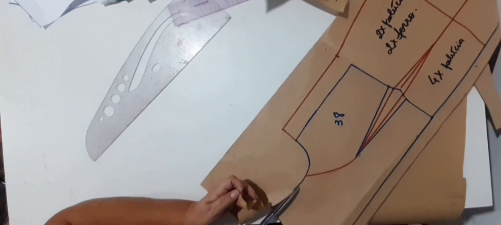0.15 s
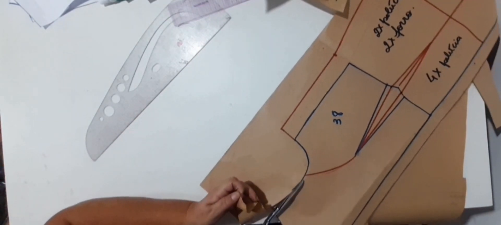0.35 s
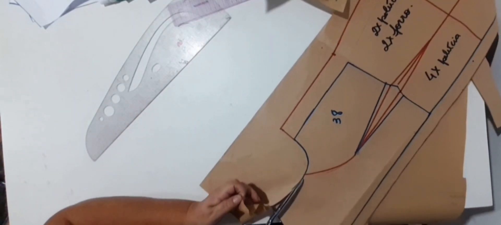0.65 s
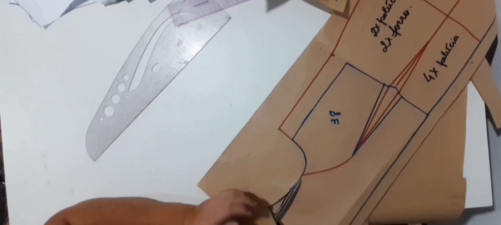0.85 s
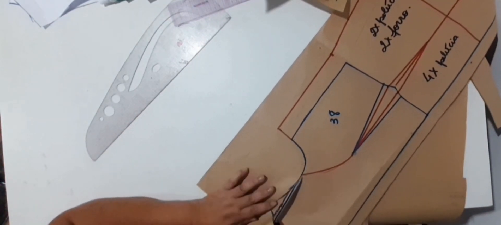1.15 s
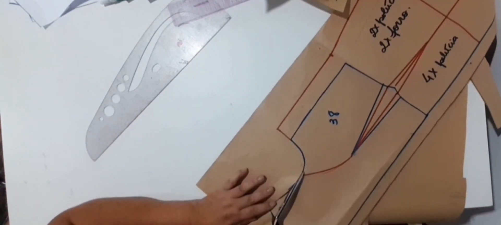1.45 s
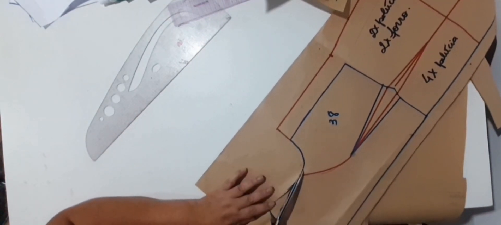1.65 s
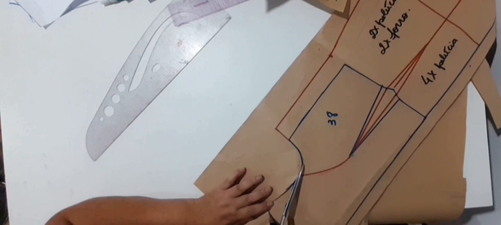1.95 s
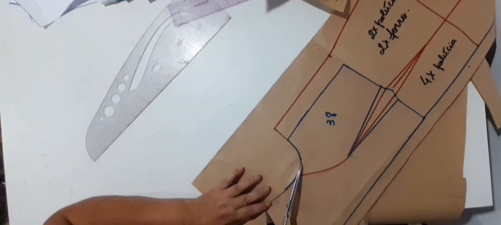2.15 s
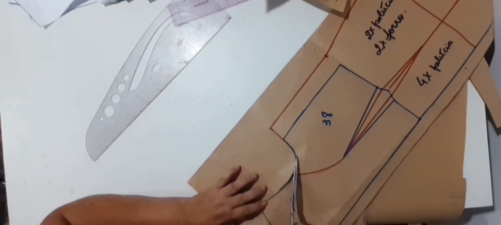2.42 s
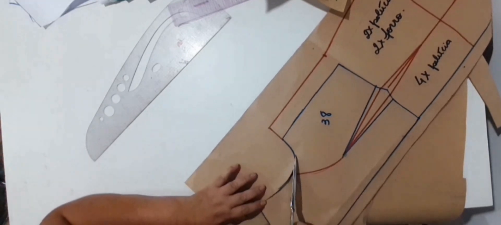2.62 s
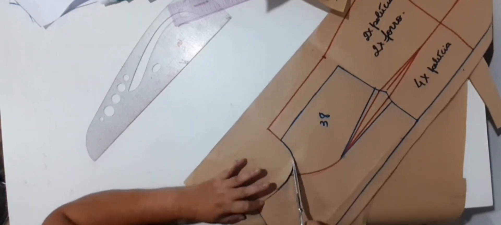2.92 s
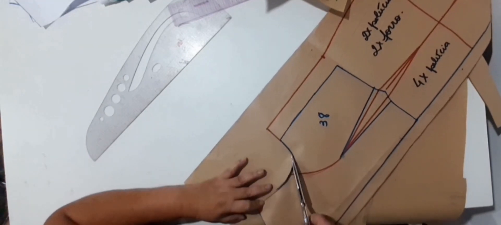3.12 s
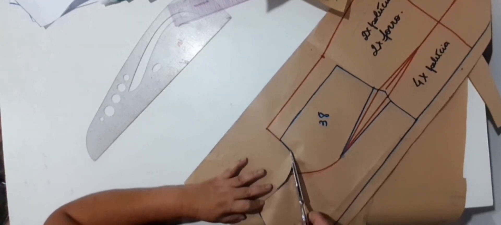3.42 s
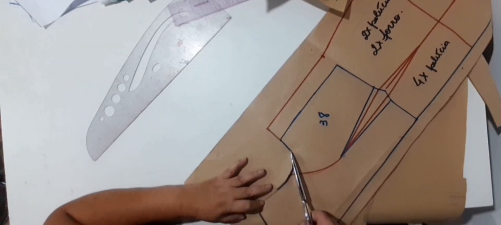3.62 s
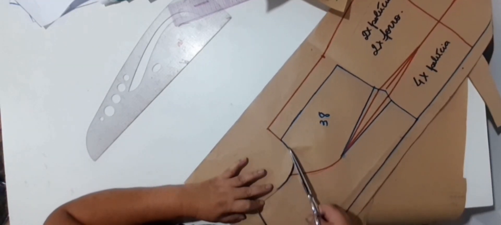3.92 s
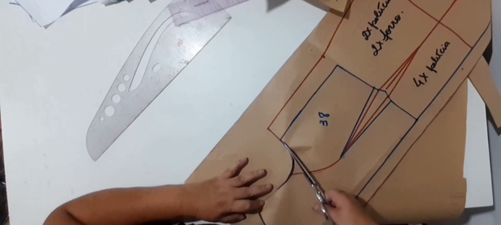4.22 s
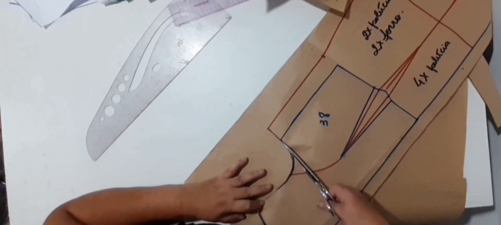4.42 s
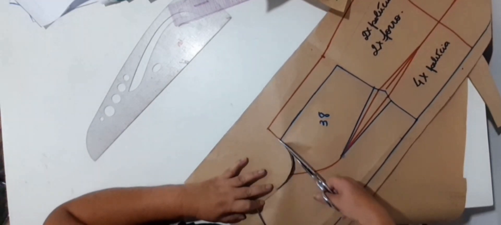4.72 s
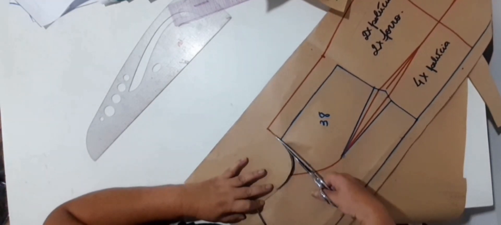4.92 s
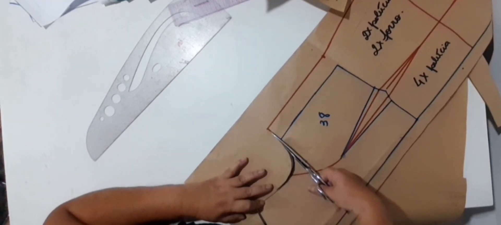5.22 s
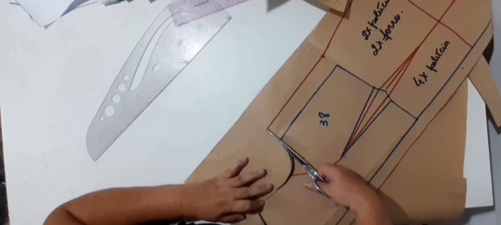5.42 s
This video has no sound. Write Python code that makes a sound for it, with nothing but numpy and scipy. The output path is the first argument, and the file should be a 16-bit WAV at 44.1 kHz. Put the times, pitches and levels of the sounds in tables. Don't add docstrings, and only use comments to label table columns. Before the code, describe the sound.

A scissor crunch starts almost at once, then fingers brush the sheet and a hand lands dully on the table. Clustered snips follow, strongest around the middle, then more spaced cuts to the end. Scraping blades, paper snaps and low table hum fill the gaps. Near stereo pickup, small quiet room, faint background air.

```python
import sys
import numpy as np
from scipy import signal
from scipy.fft import rfft, irfft, next_fast_len
from scipy.io import wavfile
from scipy.ndimage import uniform_filter1d

SR = 44100
rng = np.random.default_rng(int(sys.argv[2]) if len(sys.argv) > 2 else 0)


def wrap_up_sound(samples):
    columns = np.atleast_2d(samples).T
    tamed = np.clip(columns, -1, 1)
    steps = np.round(tamed * 32767).astype(np.int16)
    wavfile.write(sys.argv[1], SR, steps)


def ratio(d):
    e = np.asarray(d, float) / 20
    return 10 ** e


N = 245005


def evened(x):
    return x / np.sqrt(np.mean(x ** 2) + 1e-20)


def read(points, hz):
    f, value = np.transpose(points)
    return np.interp(np.log(hz + 1), np.log(f + 1), value)


def curves(rows):
    times, *columns = np.transpose(rows)
    return [np.interp(np.arange(N) / SR, times, column) for column in columns]


def body(colour, modes, lo_hz, hi_hz):
    hz = abs(np.fft.fftfreq(8192, 1 / SR)) + 1
    peaks = 1 + sum(ratio(2 * db) / (1 + (2 * (hz - f) / w) ** 2) for f, w, db in modes)
    band = 1 / (1 + (lo_hz / hz) ** 12) / (1 + (hz / hi_hz) ** 12)
    log_gain = np.log(ratio(read(colour, hz)) * np.sqrt(peaks * band) + 1e-6)
    taps = np.fft.ifft(np.exp(np.conj(signal.hilbert(log_gain)))).real[:6000]
    return taps / np.linalg.norm(taps)


def fibres(per_s, spread_db, clump_db, clump_s, smooth):
    sizes = ratio(spread_db * np.minimum(rng.exponential(1, N), 5)) * rng.choice([-1., 1.], N)
    ticks = evened(sizes * (rng.random(N) < per_s / SR))
    span = int(clump_s * SR)
    clumps = evened(uniform_filter1d(uniform_filter1d(rng.standard_normal(N), span), span))
    rubbed = ticks + smooth * rng.standard_normal(N)
    return evened(rubbed * ratio(clump_db * np.clip(clumps, -2.5, 2.5)))


def rub(drives, gains, colour, modes, bands_hz):
    out = np.zeros(N)
    for drive, gain, band in zip(drives, gains, bands_hz):
        out += signal.oaconvolve(drive * gain, body(colour, modes, *band))[:N]
    return out


def resonate(x, hz, width_hz):
    turn = np.exp(2j * np.pi * np.cumsum(hz * np.ones(N)) / SR)
    keep = np.exp(-np.pi * width_hz / SR)
    return 2 * (turn * signal.lfilter([1 - keep], [1, -keep], x / turn)).real


def bending(x, patchy_db, size=256):
    hz, _, z = signal.stft(x, SR, nperseg=size, noverlap=size * 3 // 4)
    patches = rng.standard_normal(z.shape[::-1]).T
    patches = uniform_filter1d(patches, size=3, axis=0)
    patches = evened(uniform_filter1d(patches, size=8192 // size, axis=1))
    depth_db = patchy_db * np.clip(hz / 2500, 0, 1)[:, None]
    mean_db = np.log(10) / 20 * depth_db ** 2
    return signal.istft(z * ratio(depth_db * patches - mean_db), nperseg=size, noverlap=size * 3 // 4)[1][:N]


# f/Hz, level/dB per Hz
AIR_COLOUR = [(18, -57), (30, -3), (519, -7.5), (1180, -22), (1530, -19), (3500, -19), (5890, -28),
              (7470, -19.5), (13700, -30), (16500, -33)]


def room_air():
    air = signal.oaconvolve(rng.standard_normal(N), body(AIR_COLOUR, [], 27, 14000))[:N]
    return bending(ratio(-73) * air, patchy_db=2.2)


# peak t/s, rise/s, fall/s, scrape level/dB, fizz re scrape/dB
SLIDES = [(.05, 0.18, 0.23, -51.5, -7), (.26, 0.75, 0.36, -51, -5.5), (.72, 0.26, 0.34, -58.5, -1.5),
          (.82, 0.48, 0.094, -63, -0.5), (1.05, 0.073, 0.15, -51, 0), (1.19, 0.58, 0.54, -58.5, 0),
          (1.35, 0.15, 0.16, -62.5, -5), (1.64, 0.033, 0.076, -80, -4), (1.74, 0.35, 0.33, -57.5, -2.5),
          (1.869, 0.13, 0.12, -50, 0.5), (2.15, 0.53, 0.71, -59.5, 4.5), (2.302, 0.12, 0.27, -54.5, 10.5),
          (2.368, 0.27, 0.1, -41.5, -2), (2.999, 0.28, 0.44, -58.5, 1), (3.085, 0.092, 0.042, -54.5, -46),
          (3.14, 0.075, 0.2, -58, -25), (3.27, 0.11, 0.096, -65.5, -10), (3.33, 0.044, 0.053, -83, 11),
          (3.83, 0.11, 0.038, -58, 4), (3.98, 0.46, 0.11, -54.5, 3), (4.06, 0.33, 0.1, -57.5, 0.5),
          (4.57, 0.11, 0.24, -61.5, 6), (4.698, 0.22, 0.2, -49, 1), (4.77, 0.15, 0.11, -54, -7),
          (5.1, .05, 0.22, -60.5, -1.5), (5.17, 0.19, 0.15, -58.5, 0.5), (5.235, 0.26, 0.16, -54, 0),
          (5.291, 0.2, 0.042, -51.5, -4.5), (.22, 0.088, .12, -56, -12), (1.68, 0.071, 0.19, -72, -7),
          (2.42, 0.054, 0.1, -53.5, -4), (3.21, 0.12, 0.13, -80, -20), (4.74, 0.1, 0.069, -49.5, 4),
          (1.94, .08, 0.089, -61, -5), (3.64, .05, 0.053, -67, 1), (4.6, 0.082, .1, -61.5, 6),
          (3.485, .04, .04, -61, -3)]


def swells():
    peak, rise, fall, scrape_db, fizz_db = np.transpose(SLIDES)[:, :, None]
    t = np.arange(0, N + 32, 32) / SR - peak
    loss_db = -37 * np.maximum(-t / rise, t / fall) ** 1.2
    drone_db = -1.5 + 0.53 * fizz_db + 0.79 * loss_db
    sheet_share, usual_db = 0.71, -57.5
    sheet_db = -8 + sheet_share * loss_db + (1 - sheet_share) * (usual_db - scrape_db)
    parts = [loss_db, drone_db, fizz_db + loss_db, sheet_db]
    return [np.repeat(np.sqrt((ratio(scrape_db + part) ** 2).sum(0)), 32)[:N] for part in parts]


# f/Hz, level/dB per Hz
SLIDE_COLOUR = [(88, -43), (150, -9), (245, -2.5), (293, -11.5), (409, -5), (606, -12), (2600, -10.5),
                (6050, -10.5), (13800, -3.5), (15600, -7), (16500, -36)]
# f/Hz, width/Hz, level above the colour/dB
SLIDE_MODES = [(202, 110, 0.5), (333.7, 16, 11.5), (415, 45, 9), (489, 8.2, 11), (4340, 2600, -0.5),
               (6980, 240, 7), (7640, 730, 8.5), (12800, 830, -28)]
# t/s, f/Hz, flap share, share of the flap's upper ring near 4.6 kHz
FLAP = [(0.0, 2830, 0.69, 0.18), (.17, 3730, 0.81, 0.2), (.3, 2340, 1.7, 0.1), (.7, 3130, 0.38, 0.2),
        (0.942, 2230, 0.46, 0.23), (1.05, 3680, 0.53, 0.24), (1.25, 3650, 2.5, 1.2), (1.7, 3650, 1.9, 0.67),
        (1.9, 2540, 0.93, 0.61), (2.35, 2600, 1.83, 0.87), (2.98, 2770, 1.8, 0.4), (3.1, 2480, 2.9, 1.1),
        (3.28, 1910, 2.4, 1.8), (3.85, 3350, 0.3, 0.35), (3.97, 2920, 0.97, 2.3), (4.62, 2760, 2.24, 1.6),
        (5.07, 3030, 0.88, .5), (5.28, 2530, 1.96, 0.28)]


def slide():
    drive = fibres(per_s=5000, spread_db=0.5, clump_db=1.53, clump_s=0.029, smooth=1.75)
    crackles = fibres(per_s=90, spread_db=2.5, clump_db=2.0, clump_s=0.059, smooth=0)
    drive += 0.3 * 0.55 * crackles
    bands_hz = [(1800, 5500), (150, 600), (5500, 16500), (600, 1800)]
    scrape = rub([drive] * 4, swells(), SLIDE_COLOUR, SLIDE_MODES, bands_hz)
    flap_hz, flap, song = curves(FLAP)
    flapping = flap * resonate(scrape, flap_hz, width_hz=650)
    singing = song * resonate(scrape, 4610, width_hz=120)
    return bending(ratio(-4.0) * (scrape + flapping + singing), patchy_db=2.0)


# f/Hz, width/Hz, level/dB
BOARD_MODES = [(56.6, 8.5, -20), (102, 25, 8)]
# t/s, level/dB
THUMPS = [(0.711, -66), (1.033, -40), (1.046, -30.5), (1.063, -54), (1.111, -44), (1.151, -49), (1.24, -52),
          (1.538, -50), (1.858, -50), (2.978, -50), (3.09, -62), (3.29, -68), (0.031, -55), (3.202, -68),
          (4.0, -51.5), (4.31, -52), (4.37, -44), (4.869, -52)]
# f/Hz, level/dB, t60/s
THUMP_MODES = [(57.3, -16.5, 0.64), (102, -2, 0.18), (200, 0.5, 0.068), (241.3, -3.5, 0.1),
               (412, -13, 0.14), (841, -17.5, 0.11), (1570, -13, 0.072)]


def table():
    boards = body([(20, -50), (48, -7.5), (200, -9.5)], BOARD_MODES, 34, 237)
    stir = ratio(-13) * bites()[0] + ratio(-4.5) * swells()[3]
    stir = uniform_filter1d(stir, int(0.11 * SR))
    hum = signal.oaconvolve(rng.standard_normal(N) * stir, boards)[:N]
    t, blows = np.arange(SR // 2) / SR, np.zeros(N)
    ring = sum(ratio(db - 60 * t / t60) * np.sin(2 * np.pi * hz * t) for hz, db, t60 in THUMP_MODES)
    for s, db in THUMPS:
        blows[round(s * SR)] = ratio(db)
    soft_ring = ring * np.minimum(t / 0.0069, 1)
    return ratio(-1.5) * hum + signal.oaconvolve(blows, soft_ring)[:N]


# f/Hz, level/dB per Hz
CUT_COLOUR = [(59, 1), (100, 1.5), (285, -1), (410, 3), (541, -7.5), (1330, -6.5), (1900, -8), (2990, -3),
              (9880, -21), (13000, -14), (15500, -12.5), (16500, -66)]
# f/Hz, width/Hz, level above the colour/dB
SHEET_MODES = [(183, 12, 11.5), (213.4, 28, 16.5), (338, 13, 17.5), (422, 35, 13.5), (476, 2.8, 25),
               (694, 90, 20.5), (890, 61, 20.5), (1350, 82, 20.5), (1615, 63, 13)]
# f/Hz, width/Hz, level above the colour/dB
BLADE_MODES = [(2420, 280, 13.2), (3020, 130, 13.3), (3270, 230, 6.4), (3900, 910, 8.8), (4800, 110, 11),
               (6420, 150, 11.5), (7920, 2570, 14.1), (12080, 1360, 9.2)]


def snaps(events, rise_s, crack, ring_share, trim_db, top_hz=6570):
    out, t = np.zeros(N + 8000), np.arange(4000) / SR
    modes = [*SHEET_MODES, *BLADE_MODES]
    sheet = body(CUT_COLOUR, modes, 453, top_hz)
    fizz = body(CUT_COLOUR, modes, 6780, 21000)
    for s, db, hz, fizz_db, t60 in events:
        fade = ratio(-60 * np.maximum(t - rise_s, 0) / np.clip(t60, .004, .1))
        burst = rng.standard_normal(4000) * fade * np.minimum(t / rise_s, 1)
        burst[round(rise_s * SR)] += crack
        ring = np.sin(2 * np.pi * hz * t) * ratio(-60 * t / 0.0055)
        ring /= np.linalg.norm(ring)
        mixed = sheet[:4000] + ring_share * ring + ratio(fizz_db + 14.0) * fizz[:4000]
        start = round((s - 0.55 * rise_s) * SR)
        out[start:start + 7999] += ratio(db + trim_db) * signal.fftconvolve(burst, mixed)
    return out[:N]


# t/s, peak level/dB, f/Hz
TICKS = [(0.0555, -40, 3300), (0.067, -37, 2500), (0.2144, -38, 2940), (0.3494, -50, 1940),
         (0.4389, -35, 2400), (0.5119, -28, 2950), (0.5835, -29.5, 3600), (0.6594, -43, 2000),
         (0.7694, -52, 1940), (0.797, -42, 2100), (1.128, -37, 4430), (1.1394, -39, 4360),
         (1.2262, -35, 4170), (1.2794, -42, 2360), (1.353, -43, 2600), (1.3684, -45, 2490),
         (1.3952, -37.5, 2720), (1.4034, -38, 2740), (1.5018, -21, 2930), (1.5195, -23, 2940),
         (1.64, -33, 4280), (1.6504, -43, 3900), (1.6901, -43, 4240), (1.7594, -45, 3480),
         (2.189, -44, 1650), (2.2697, -36, 2620), (2.29, -32, 2090), (2.311, -38, 2570),
         (2.3231, -29, 4700), (2.3397, -24.5, 2500), (2.3494, -38, 2570), (2.373, -21, 2300),
         (2.611, -43, 3230), (3.0834, -48, 2490), (3.4396, -33, 2420), (3.4553, -28, 1490),
         (3.555, -29, 1520), (4.3244, -42, 3020), (4.6448, -46, 2370), (4.6924, -36.5, 2300),
         (4.735, -29, 3100), (4.9414, -40, 2240), (5.2294, -51, 2270), (5.441, -47, 2920),
         (0.447, -32, 2830), (0.4558, -27, 2950), (0.4952, -30, 2700), (0.5177, -35, 2970),
          (0.545, -29, 2570), (1.1434, -47, 4360), (1.1826, -31.5, 3650), (1.207, -37, 4290),
          (1.2451, -39, 3260), (1.5362, -27, 3270), (1.6584, -47, 4230), (1.6714, -45, 3570),
          (2.387, -29, 2420), (3.3444, -65, 2330), (4.368, -35, 2370), (4.9084, -42, 2260)]


def fibre_ticks():
    events = [(s, db, hz, -14.5, 0.0087) for s, db, hz in TICKS]
    return snaps(events, rise_s=0.00041, crack=1.2, ring_share=2.6, trim_db=-21)


# t/s, peak level/dB, f/Hz, die-away/s
BRUSHES = [
    (.067, -35, 420, 0.035),
    (.917, -46.5, 500, .09),
    (.94, -53, 804, .1),
    (.965, -46, 690, 0.088),
    (1.003, -52, 800, .03),
]


def brushes():
    events = [(s, db, hz, -60, t60) for s, db, hz, t60 in BRUSHES]
    return snaps(events, rise_s=0.00383, crack=1.5, ring_share=2.4, trim_db=-19.0, top_hz=1490)


# t/s, peak level/dB, f/Hz, fizz re peak/dB, die-away/s
CREASES = [(0.316, -33, 2420, -24, 0.025), (0.446, -35, 2400, -41, 0.0067), (0.696, -41, 4260, -25, 0.024),
           (0.715, -33, 830, -35, 0.089), (0.833, -46, 2170, 0.5, 0.025), (.859, -46, 2600, -17, 0.017),
           (0.989, -35.5, 1000, -26, 0.014), (1.029, -41.5, 1570, 1.5, 0.027),
           (1.176, -31, 3220, -17, 0.011), (1.189, -30.5, 3820, -16, 0.018),
           (1.244, -41, 3300, -5.5, 0.016), (1.334, -38.5, 2780, -8.5, 0.014),
           (1.629, -34, 3570, -10, 0.02), (1.837, -21.5, 1910, -38, 0.021), (1.881, -31, 500, -14, 0.016),
           (1.985, -30, 2600, -29, 0.025), (2.105, -43, 2500, -18, 0.027), (2.143, -44, 3000, -10, 0.014),
           (2.256, -33, 3120, -2, 0.016), (2.27, -37, 2600, 3, .015), (2.29, -35, 2090, 1.5, 0.032),
           (2.324, -30, 4700, -4, 0.042), (2.374, -20.5, 2500, -20, 0.017), (2.387, -34.5, 2400, 0, 0.031),
           (2.493, -38, 1300, -8, .04), (2.999, -55, 2500, -7, .01), (3.3, -38.5, 2320, -11, 0.0085),
           (3.385, -39, 4300, -2, 0.029), (3.796, -37.5, 2580, -5, 0.036), (3.81, -38, 2680, -15, .015),
           (3.946, -48, 2720, 0, 0.033), (4.038, -49, 3000, 0, .02), (4.184, -35, 2260, -45, 0.016),
           (4.185, -43, 1570, -42, 0.065), (4.503, -39.5, 4500, -11, 0.039), (4.84, -42.5, 2920, -18, .04),
           (5.087, -44, 4700, -16, 0.025), (5.271, -30.5, 2920, -11, 0.012), (5.147, -39, 2700, -20, .015)]


def creases():
    return snaps(CREASES, rise_s=.0005, crack=2.5, ring_share=1.2, trim_db=-17.5)


# start t/s, digging-in/s, length/s, sheet level/dB, blades re sheet/dB
CUTS = [(0.44, 0.0035, 0.16, -47.5, 2), (1.382, 0.0063, 0.036, -56.5, 0), (1.436, 0.0098, 0.13, -49.5, 0),
        (1.841, 0.0063, 0.017, -54, 4), (1.959, 0.082, 0.1, -45, -1.5), (2.507, 0.017, 0.29, -51, 1.5),
        (2.704, 0.0084, 0.074, -52.5, 4), (3.387, 0.042, 0.077, -45.5, -1),
        (3.499, 0.0067, 0.09, -43.5, -1.5), (3.671, 0.0014, 0.088, -47, 2),
        (4.292, 0.021, 0.096, -44.5, -2), (4.408, 0.0068, 0.055, -53, -2), (4.84, 0.0078, 0.057, -51.5, -2),
        (4.864, 0.03, 0.12, -44, -1.5), (5.434, 0.029, 0.17, -43.5, -2)]
# level re blade ring/dB, loss/dB per s
DULLING = [
    (-3.1, 111),
    (-4, 35),
    (-4.5, 35),
]


def bites():
    start, dig, length, sheet_db, blade_db = np.transpose(CUTS)[:, :, None]
    t = np.arange(0, N + 32, 32) / SR - start
    held, after = np.clip(t, 0, length), np.maximum(t - length, 0)
    digging = np.maximum(1 - t / dig, 0)
    db = sheet_db - 13.5 * digging - 17.5 * held - 292 * after
    blades_db = db + blade_db - 3 * digging - 94 * after
    parts = [db] + [blades_db + re_db - loss_db * held for re_db, loss_db in DULLING]
    parts[2] = parts[2] - 0.7 * start
    return [np.repeat(np.sqrt((ratio(part) ** 2 * (t > 0)).sum(0)), 32)[:N] for part in parts]


# t/s, f/Hz, share
BLADE_RING = [(.44, 2540, 2), (.6, 2630, 2.2), (1.44, 2740, 1.6), (1.56, 2870, 1.4), (2.0, 2840, 0.26),
              (2.5, 2600, 0.9), (2.75, 2300, 0.96), (3.4, 2420, 1.07), (3.7, 2410, 0.38), (4.3, 2460, 2.1),
              (4.45, 2400, 0.36), (4.85, 2420, 3.4), (4.91, 2340, 0.93), (5.0, 2300, 1.1), (5.44, 2317, 5),
              (5.55, 2330, 2.1)]


def cut():
    shared, *own = (fibres(per_s=4000, spread_db=3.2, clump_db=2.2, clump_s=.004, smooth=.75) for _ in range(5))
    drives = [.6 * shared + .8 * part for part in own]
    bands_hz = [(150, 1900), (1900, 3400), (3400, 5800), (5800, 16500)]
    tear = rub(drives, bites(), CUT_COLOUR, [*SHEET_MODES, *BLADE_MODES], bands_hz)
    ring_hz, share = curves(BLADE_RING)
    return bending(tear + share * resonate(tear, ring_hz, width_hz=83), patchy_db=1.5)


# t/s, peak level/dB, f/Hz, die-away/s
JERKS = [(0.451, -25, 2490, 0.074), (0.512, -22.5, 977, 0.058), (0.545, -22.5, 1320, 0.13),
         (0.576, -26.5, 3440, 0.08), (1.051, -28, 4220, 0.072), (1.43, -23.5, 2950, 0.12),
         (1.478, -26, 2690, 0.04), (1.497, -20, 2900, 0.082), (1.519, -21, 3000, 0.029),
         (1.531, -25.5, 3100, 0.1), (2.001, -23, 930, 0.085), (2.024, -21, 2960, 0.03),
         (2.04, -21, 1660, 0.024), (2.065, -31.5, 700, 0.05), (2.501, -28.5, 2570, 0.035),
         (2.529, -20.5, 1420, 0.064), (2.568, -19.5, 2570, 0.067), (2.588, -23.5, 940, 0.047),
         (2.609, -22, 990, 0.069), (2.682, -31, 900, 0.047), (2.711, -26, 1350, 0.082),
         (2.722, -21, 2530, 0.055), (3.407, -26, 1320, 0.06), (3.509, -26.5, 2600, 0.13),
         (3.588, -32, 860, 0.043), (3.605, -31.5, 890, 0.032), (3.675, -24, 1250, 0.12),
         (3.698, -41, 2400, 0.032), (3.761, -33, 1330, 0.016), (4.307, -46, 2920, 0.04),
         (4.474, -42, 4000, 0.024), (4.868, -31, 2980, 0.082), (4.886, -39, 2300, 0.035),
         (4.905, -28, 2340, 0.019), (4.963, -39, 2350, 0.053), (4.984, -34, 2320, 0.033),
         (5.004, -43, 1310, 0.032), (3.726, -22, 734, 0.012), (4.347, -25, 935, 0.023),
         (4.367, -23, 2340, 0.048), (4.418, -30, 2400, 0.047), (4.456, -34, 810, 0.056),
         (4.94, -30, 2340, 0.025), (3.553, -34, 2400, 0.042), (5.449, -37, 1470, 0.051),
         (5.461, -39, 775, 0.023), (5.477, -25.5, 1010, 0.16)]


def jerks():
    events = [(s, db, hz, -19.5, t60) for s, db, hz, t60 in JERKS]
    return snaps(events, rise_s=.008, crack=1.8, ring_share=0.81, trim_db=-18.5)


def scattered(x, t60, count, turn_s):
    t = np.arange(int(t60 * SR)) / SR
    tails = rng.standard_normal((count, len(t))) * ratio(-60 * t / t60)
    tails /= np.linalg.norm(tails, axis=1, keepdims=True)
    place = (np.arange(N) / SR / turn_s - np.arange(count)[:, None]) % count
    turns = np.sin(np.pi / 2 * np.minimum(place, 2))
    return signal.oaconvolve(x * turns, tails, axes=1).sum(0)[:N]


# f/Hz, phase/radians
LEAD = [(0, 0), (520, 0.2), (780, -0.6), (1460, 2.8), (2070, -0.1), (2500, 0.5), (2760, 0.8), (4220, 2.0),
        (4650, 1.3), (5940, 3.6), (6370, 6.4), (6890, 6.3), (15600, 6.3), (16200, 6.3)]
# f/Hz, left minus right level/dB
LEAN = [(60, 1.5), (110, 1.0), (200, -0.5), (380, -2.0), (700, -1.0), (1290, -0.5), (2380, -0.5),
        (4400, -1.0), (8120, -1.0), (13000, -9.0)]
# f/Hz, share
SAME = [(60, .9), (250, .92), (420, .86), (620, .58), (1400, .5), (3000, .55), (5000, .35), (7000, .55),
        (15000, .55)]
# t/s, left minus right level/dB
SWAY = [
    (0, -1),
    (1.5, 0.4),
    (2.8, .5),
    (4, -0.6),
    (5.5, -1.5),
]


def two_ports(work, air):
    size = next_fast_len(N + 4096)
    hz = np.fft.rfftfreq(size, 1 / SR)
    far = ratio(-13) / (1 + hz / 4000) * rfft(scattered(work, t60=.25, count=4, turn_s=.07), size)
    near = rfft(scattered(work + air, t60=.015, count=9, turn_s=.05), size)
    same, half_lead = read(SAME, hz), read(LEAD, hz) / 2
    mid_power = same * np.cos(half_lead) ** 2 + (1 - same) / 2
    side_power = (1 - mid_power) / mid_power
    linked = same * np.sin(2 * half_lead) / 2 / mid_power
    mid = rfft(work + air, size) + far + 0.12 * hz / (hz + 500) * near
    side = 1j * linked * mid + np.sqrt(side_power - linked ** 2) * near
    halves = np.array([[.5], [-.5]])
    ports = irfft(np.array([mid + side, mid - side]) * ratio(halves * read(LEAN, hz)), size)[:, :N]
    return ports * ratio(halves * curves(SWAY)[0])


def scene():
    air = room_air()
    work = bending(slide() + table() + cut(), patchy_db=2.5, size=1024)
    work += fibre_ticks() + brushes() + creases() + jerks()
    return two_ports(work, air)


def roll_off(x):
    return signal.sosfilt(signal.butter(12, 16660, fs=SR, output="sos"), x)


# f/Hz, level re the sum/dB
KEEP_SIDE = [(5500, -14), (7000, -3), (8300, -5), (9800, -3), (11000, -9), (14000, -8), (15500, -2)]


def record(dry):
    left, right = signal.sosfilt(signal.butter(3, 42, "high", fs=SR, output="sos"), dry)
    hz, _, (mid, side) = signal.stft([left + right, left - right], SR, nperseg=2048)
    band = (hz // 690).astype(int)
    starts = np.flatnonzero(np.diff(band, prepend=-1))
    mid_power, side_power = (np.add.reduceat(abs(z) ** 2, starts) for z in (mid, side))
    kept = side_power > mid_power * ratio(2 * read(KEEP_SIDE, hz[starts]))[:, None]
    kept = kept[band] | (hz < 5500)[:, None]
    side = signal.istft(side * kept, nperseg=2048)[1][:N]
    return roll_off(np.array([left + right + side, left + right - side]) / 2)


dry = scene()
out = record(dry)
wrap_up_sound(out)
```